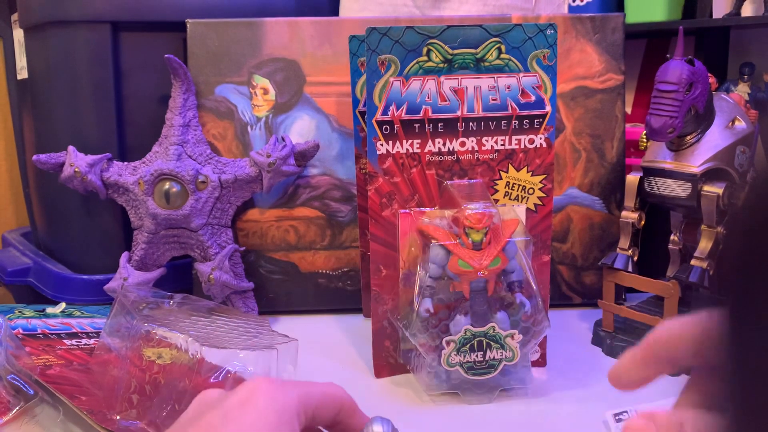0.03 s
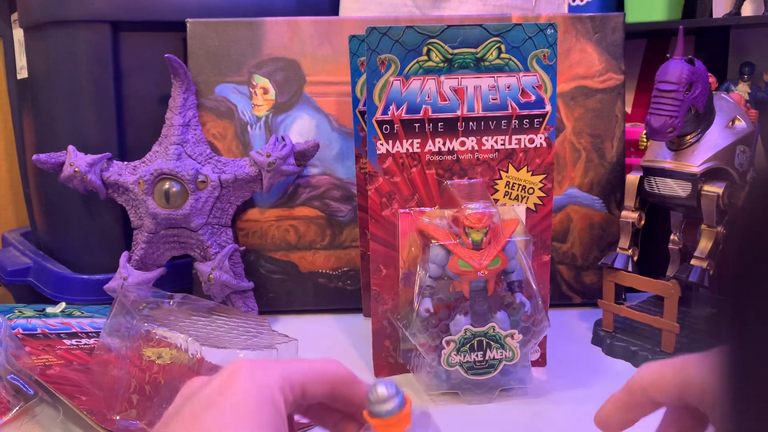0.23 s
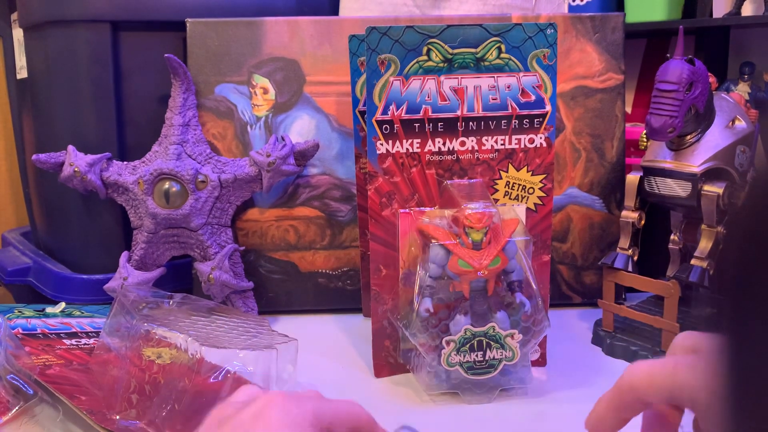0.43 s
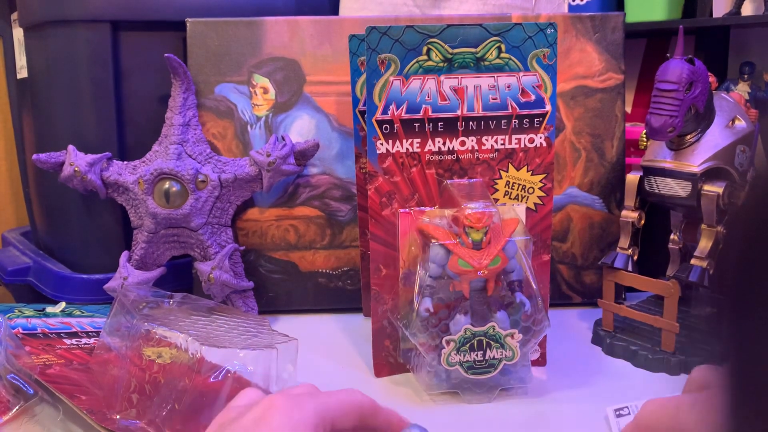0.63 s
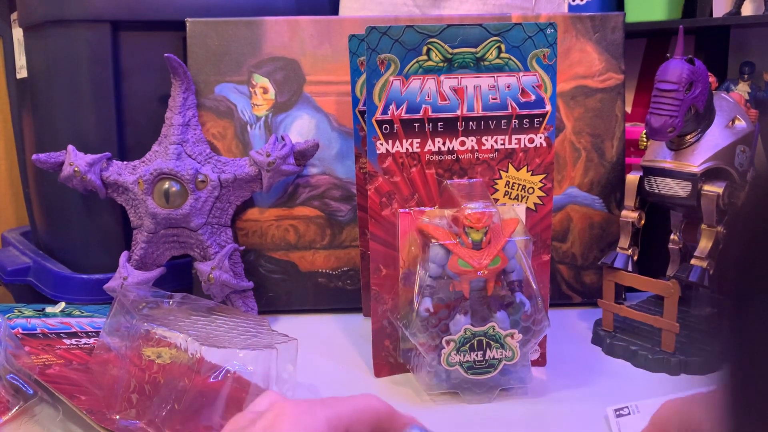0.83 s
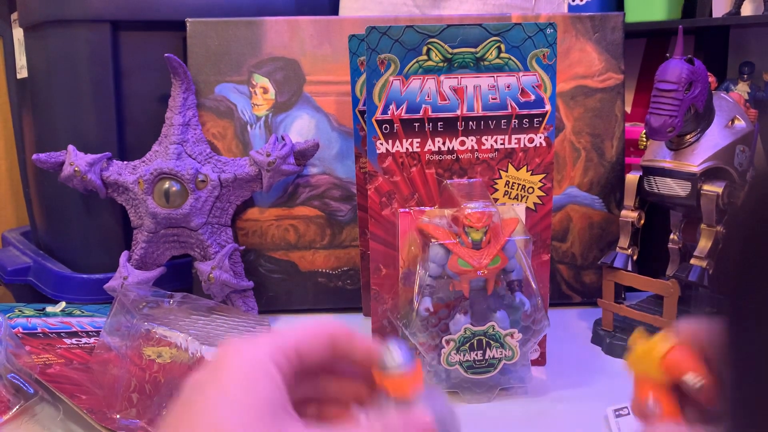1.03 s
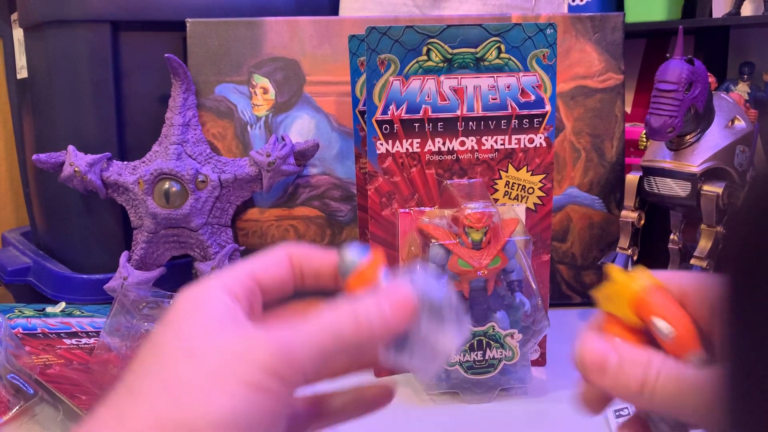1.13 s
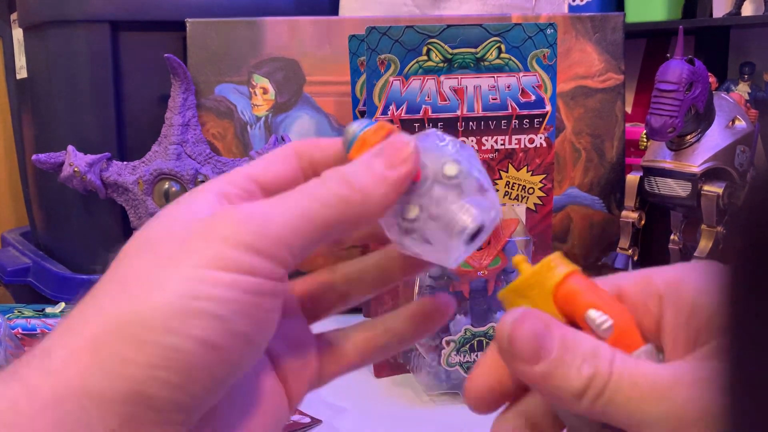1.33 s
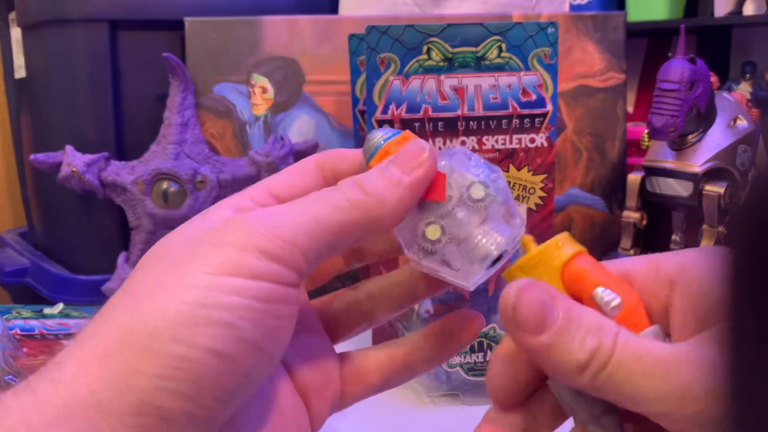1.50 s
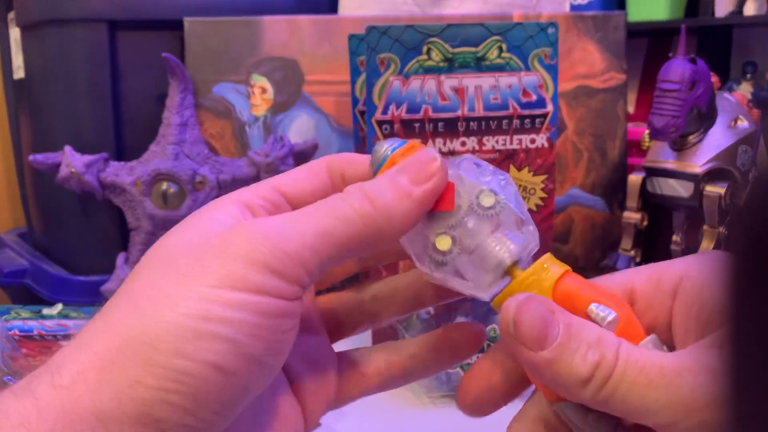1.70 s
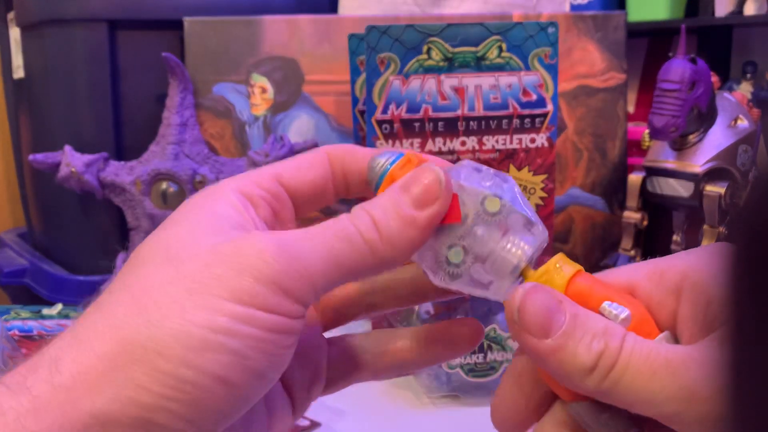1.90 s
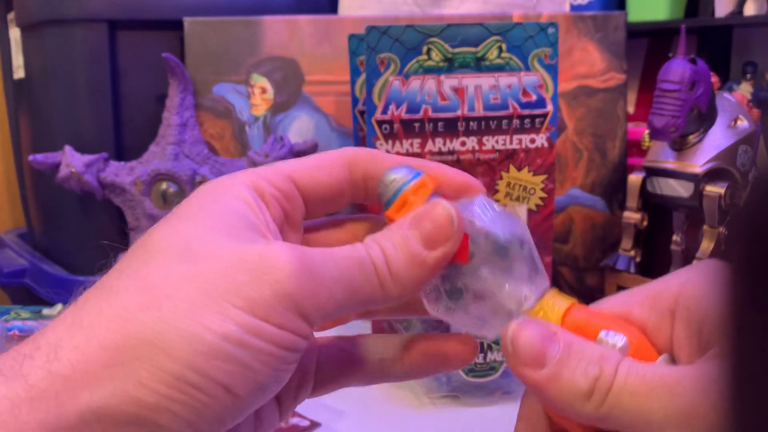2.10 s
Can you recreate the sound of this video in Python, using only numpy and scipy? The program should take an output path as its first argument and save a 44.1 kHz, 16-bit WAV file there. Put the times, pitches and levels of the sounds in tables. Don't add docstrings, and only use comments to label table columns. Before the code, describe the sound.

Hollow plastic toy part clatters on a table, then small parts click and snap in hands

```python
import sys
import numpy as np
from scipy import signal
from scipy.fft import rfft, irfft
from scipy.io import wavfile
from scipy.ndimage import uniform_filter1d

SR = 44100
rng = np.random.default_rng(int(sys.argv[2]) if len(sys.argv) > 2 else 0)


def unload_wav(signal):
    wavfile.write(
        sys.argv[1],
        SR,
        np.round(np.clip(np.atleast_2d(signal).T, -1, 1) * 32767).astype(np.int16),
    )


def ratio_of_db(decibels):
    return 10 ** (np.asarray(decibels, float) / 20)


N = 94815
T = np.arange(N) / SR
STRIKE_N = 8192
BASS_HZ = 220


def colour(x, points):
    hz, db = np.array(points).T
    f = np.arange(x.shape[-1] // 2 + 1) * SR / x.shape[-1] + 1
    gain = ratio_of_db(np.interp(np.log(f), np.log(hz), db, left=-70, right=-70))
    y = irfft(rfft(x) * gain, x.shape[-1])
    return y / np.std(y)


def curve(rows):
    s, db = np.array(rows).T
    return ratio_of_db(np.interp(T, s, db))


def walk(rate):
    k = int(SR / rate)
    steps = np.repeat(rng.standard_normal(N // k + 1), k)
    w = uniform_filter1d(steps, k)[:N]
    return w / np.std(w)


def grit(spiky_db):
    return rng.standard_normal(N) * ratio_of_db(spiky_db * walk(400.))


def band(hz, width, size=N):
    b, a = signal.iirpeak(hz, hz / width, fs=SR)
    once = signal.lfilter(b, a, rng.standard_normal(size))
    y = signal.lfilter(b, a, once)
    return y / np.std(y)


def swell(centre_s, length_s, power):
    return np.exp(-((T - centre_s) / length_s) ** power)


def decay(t60):
    return np.exp(-np.log(1000) * T[:STRIKE_N] / t60)


def ring(modes, cap_s=1.):
    hz, db, t60 = np.array(modes).T[:, :, None]
    level, detune, phase = rng.standard_normal((3, len(modes), 1))
    hz = hz * (1 + 0.008 * detune)
    tone = np.sin(2 * np.pi * hz * T[:STRIKE_N] + 2 * phase)
    y = np.sum(ratio_of_db(db + 2.2 * level) * decay(np.clip(t60, .003, cap_s)) * tone, axis=0)
    return y / np.abs(y).max()


def burst(hz, width, t60):
    return band(hz, width, size=STRIKE_N) * decay(t60)


def add(out, s, x, contact_s):
    y = x * (1 - np.exp(-(T[:len(x)] / max(contact_s, 3e-5)) ** 2))
    y = y * np.abs(x).max() / np.abs(y).max()
    i = int(s * SR)
    out[i:i + len(x)] += y[:N - i]


# time in seconds, level in dB.
RUMBLE = [(0, -71), (.18, -51), (.3, -66.5), (.44, -61), (.47, -48.5), (.55, -55), (.65, -60), (.7, -49),
          (.74, -48), (.79, -45), (.87, -46), (.92, -51), (.96, -66), (1.2, -62), (2.1, -68), (2.15, -42.5)]
# frequency in Hz, level in dB.
STAND = [(20, -34.5), (35, -8.5), (55, 2), (80, -4.5), (170, -14), (260, -22.5), (400, -38)]
# frequency in Hz, level in dB.
AIR = [(15, -31), (25, -7), (87, 5), (796, -23.5), (4370, -35.5), (7310, -60), (8360, -33), (14000, -44.5),
       (16000, -54)]


def floor():
    mid, side = colour(rng.standard_normal((2, N)), STAND) * curve(RUMBLE) * ratio_of_db(0.78 * walk(25.))
    rumble = mid + ratio_of_db(-8.5) * side * np.array([[1], [-1]])
    air = colour(rng.standard_normal((2, N)), AIR)
    low = uniform_filter1d(air, size=101, axis=1)
    air = air - low + low[0]
    fan = np.array([band(1300, 190) for _ in range(2)])
    fan = fan * ratio_of_db(-76.5 + 3.15 * walk(28.0)) * (0.62 + swell(1.1, .26, 4))
    return rumble + ratio_of_db(-63.5 + 1.8 * walk(2.0)) * air + fan


# time in seconds, level in dB.
SLIDE = [(0, -63), (.07, -76), (.14, -85), (.155, -64.5), (.2, -57), (.28, -62.5), (.32, -83.5), (.36, -53),
         (.42, -72.5), (.44, -42.5), (.5, -43.5), (.56, -57.5), (.6, -53), (.66, -51.5), (.71, -74),
         (.8, -74.5), (.83, -67), (.95, -77.5)]
# frequency in Hz, level in dB, t60 in seconds.
SHELL_MODES = [(1060.6, -0.5, 0.052), (1137, -3, 0.039), (1238, -9.5, 0.045), (1408, -11.5, 0.032),
               (1403, -15.5, .05), (1618, -0.5, 0.045), (1708, -4, .05), (2045, -13, 0.048),
               (2276, -9, 0.043), (2443, -13.5, 0.046), (2620, -12.5, .025), (2980, -8.5, 0.023)]
# frequency in Hz, level in dB, t60 in seconds.
BOARD_MODES = [(173, -3.5, 0.12), (239.4, 0.5, 0.085), (323, 1, 0.034), (392, -0.5, 0.11), (413, 1.5, 0.09),
               (529, -6, 0.073), (605.6, 0.5, 0.12), (748, -6.5, 0.059), (853, -2.5, 0.068),
               (900, -6, 0.11)]
# frequency in Hz, level in dB.
CRACK = [(1800, -30.5), (2400, -5.5), (3400, -7.5), (4600, -0.5), (5800, -10.5), (8500, -9.5), (12500, -9),
         (16000, -33.5)]
# frequency in Hz, level in dB.
SCRAPE = [(900, -17), (2300, -3), (4500, 3), (6000, -5), (9000, -16.5), (12000, -19), (16000, -36)]


def slide():
    shell = signal.fftconvolve(grit(1.9), ring(SHELL_MODES, 0.06))[:N]
    boom = signal.fftconvolve(grit(1.9), ring(BOARD_MODES, 0.033))[:N]
    rubbing = shell / np.std(shell) + ratio_of_db(5) * boom / np.std(boom)
    rubbing += ratio_of_db(-15.5) * colour(grit(0.53), CRACK)
    rubbing += ratio_of_db(-4.5 + 0.4 * walk(68.0)) * band(820, 1700)
    lifted = np.clip((1.05 - T) / 0.015, 0, 1)
    squeak = ratio_of_db(-41) * swell(.652, 0.019, 4) * band(1610.5, 59)
    scrape = ratio_of_db(-53 + 2.5 * walk(151.5)) * swell(.64, 0.014, 2) * colour(grit(1.1), SCRAPE)
    return rubbing * curve(SLIDE) * lifted + squeak + scrape


# start in seconds, shell peak in dB,
# crack in dB re shell, table boom in dB re shell, contact in milliseconds.
KNOCKS = [(0.1476, -57, -1, 2.5, 2.4), (0.185, -49, -4.5, 5.5, 0.8), (0.2113, -19.5, -11.5, -21, 2.25),
          (0.229, -35, -17, -19, 2.5), (0.2375, -37.5, -13, -6, 0.5), (0.257, -49, -7, 0.5, 2.9),
          (0.271, -45.5, -21, -4, 1.5), (.351, -32.5, -12, -9, 1.7), (0.3568, -35, -13, -7, 0.73),
          (0.37, -34.5, -21, -16.5, 2.4), (0.3887, -48.5, -15.5, -6.5, 2.1), (0.396, -47, -14, -5, 1.5),
          (0.4452, -24.5, 3.5, -8, 0.86), (0.4476, -16.5, -6.5, -4.5, 0.78), (0.4526, -16.5, -3, -9.5, 1.8),
          (0.4567, -24, -12, -4.5, 0.58), (0.4629, -25, -6.5, -6.5, 0.62), (0.4653, -19, -0.5, -6.5, 0.61),
          (.468, -19, -6, -13.5, 0.87), (0.4748, -28, -7.5, -8, 0.95), (0.479, -28.5, -4, -5, 1.8),
          (0.487, -32.5, -8, -6, 1.1), (.492, -33, -8, -2.5, 1.5), (0.5913, -44, -22, -7.5, 1.5),
          (.821, -47.5, -9, -9, 0.81)]
# frequency in Hz, level in dB, t60 in seconds.
SMALL_MODES = [(1405, -22.5, 0.035), (2870, -11.5, 0.01), (4100, -11.5, 0.0037), (4558, 3.5, 0.009),
               (5090, -12.5, 0.011), (5790, -17.5, 0.0099), (8390, -7.5, 0.012), (9200, -17, 0.013),
               (9910, -15, 0.017)]


def knocks():
    out = np.zeros(N)
    for s, db, crack_db, boom_db, contact_ms in KNOCKS:
        contact_s = contact_ms / 1000
        add(out, s, ratio_of_db(db + 2.5) * ring(SHELL_MODES, .055), contact_s)
        add(out, s, ratio_of_db(db + boom_db + 0.5) * ring(BOARD_MODES, .14), contact_s)
        crack = colour(rng.standard_normal(STRIKE_N), CRACK) * decay(.025)
        rattle = ratio_of_db(2) * ring(SMALL_MODES)
        add(out, s, ratio_of_db(db + crack_db - 3.0) * (crack + rattle), contact_s / 3)
    return out


# start in seconds, peak in dB, frequency in Hz.
THUMPS = [(0.152, -41, 193), (.447, -26.5, 151), (0.461, -32, 71.3), (0.669, -35, 70.7), (0.757, -36, 62.2),
          (0.805, -34, 77), (0.846, -35, 60.6), (0.924, -48.5, 247), (1.411, -48.5, 202),
          (1.69, -50.5, 353), (2.135, -42.5, 142)]


def thumps():
    out = np.zeros(N)
    for s, db, hz in THUMPS:
        tone = np.sin(2 * np.pi * hz * T[:STRIKE_N])
        add(out, s, ratio_of_db(db) * tone * decay(7.6 / hz), contact_s=0.0028)
    return out


# start in seconds, peak in dB, bright edge in dB re click,
# low tock in dB re click.
CLICKS = [(0.3052, -65, -13, -22), (0.751, -76, -1, -23), (0.8638, -41.5, -9.5, -30), (0.924, -56, -25, 1),
          (1.0842, -64, -7, -16.5), (1.3286, -64.5, -24, -8), (1.4128, -69, -16, 3),
          (1.4404, -38, -3.5, -6.5), (1.4447, -33, -1, -17.5), (1.4472, -34.5, -6.5, -7.5),
          (1.4481, -38.5, -5.5, -20), (1.4630, -29.5, -41, -14.5), (1.468, -42, -37, -26),
          (1.5156, -45, -31, -10), (1.5952, -34, -25, -21.5), (1.623, -60, -18.5, 2.5),
          (1.6679, -50.5, -19.5, -17), (1.679, -37, -17, -19.5), (1.8244, -54, -21, -11),
          (1.976, -68, -12, 3.5), (1.999, -72, -3, -22.5), (2.0287, -71.5, -17.5, 15), (2.048, -70, -13, 7),
          (2.076, -88, -24.5, -10), (2.1072, -73, -14, 6), (2.13, -65, -25, 13.5)]
# frequency in Hz, width in Hz.
CLATTER = [(1500, 1900), (4700, 3000), (9500, 8000)]


def clicks():
    out = np.zeros(N)
    contact_s, snap_s, snap_contact_s = 0.00037, 1.6876, .0009
    for s, db, edge_db, tock_db in CLICKS:
        for (hz, width), rel_db in zip(CLATTER, (tock_db, 0, edge_db)):
            add(out, s, ratio_of_db(db + rel_db) * burst(hz, width, 0.029), contact_s)
    add(out, 1.6871, ratio_of_db(-18.5) * burst(9300, 2700, 0.011), contact_s / 3)
    add(out, snap_s, ratio_of_db(-9.5) * ring(SMALL_MODES, .012), snap_contact_s)
    for (hz, width), rel_db in zip(CLATTER, (-16, 0, -5)):
        add(out, snap_s, ratio_of_db(-26.5 + rel_db) * burst(hz, width, 0.045), snap_contact_s)
    return out


# time in seconds, level in dB.
RUB = [(.78, -87), (.83, -66), (.88, -62), (.95, -68), (1.05, -72), (1.1, -62.5), (1.17, -68.5),
       (1.21, -75), (1.33, -73), (1.39, -80), (1.45, -55.5), (1.55, -65), (1.65, -74.5), (1.675, -56.5),
       (1.76, -72), (1.81, -72), (1.86, -61.5), (1.93, -80.5)]
# frequency in Hz, level in dB.
SKIN = [(410, -33.5), (700, -24), (1300, -9), (1600, -12.5), (4670, -4), (7200, -20.5), (8310, -14.5),
        (13900, -17.5), (16000, -26.5)]
PATCHES = [2260, 3030, 3800, 4845, 8100]


def rub():
    hiss = colour(grit(1.7), SKIN) * ratio_of_db(2.3 * walk(24.5))
    patches = sum(ratio_of_db(-13.5 + 5 * walk(30.0)) * band(hz, hz / 4) for hz in PATCHES)
    scuff = ratio_of_db(-54.5) * swell(1.421, 0.02, 2) * band(1380, 2800)
    grip = ratio_of_db(-62 + 2.4 * walk(80.)) * swell(2.14, 0.039, 2) * band(1290, 1830)
    return (hiss + patches) * curve(RUB) + scuff + grip


def ports(x, phase, pan_db):
    f = np.arange(N // 2 + 1) * SR / N
    turn = np.exp(.5j * phase * f ** 4 / (f ** 4 + BASS_HZ ** 4))
    left = irfft(rfft(x) * turn, N) * ratio_of_db(pan_db / 2)
    right = irfft(rfft(x) / turn, N) * ratio_of_db(-pan_db / 2)
    return np.array([left, right])


def room(x):
    low_t60_s, top_t60_s, gap_s = 0.1, 0.099, 0.0022
    t = T[:16384]
    noise = rng.standard_normal((2, 16384))
    low = uniform_filter1d(noise, size=9, axis=1)
    tail = low * np.exp(-np.log(1000) * t / low_t60_s)
    tail += (noise - low) * np.exp(-np.log(1000) * t / top_t60_s)
    tail *= np.clip(t / gap_s - 1, 0, 1)
    tail = tail * ratio_of_db(-9.5) / np.sqrt(np.sum(tail ** 2) / 2)
    return signal.fftconvolve(x[None], tail)[:, :N]


def scene():
    table = slide() + knocks()
    hands = clicks() + rub()
    no_bass = signal.butter(2, BASS_HZ, "high", fs=SR, output="sos")
    to_room = signal.sosfilt(no_bass, table + ratio_of_db(-6) * hands)
    direct = ports(table, 1.47, -.4) + ports(hands, 1.44, -2.8)
    return direct + room(to_room) + floor() + thumps()


def band_limit(x):
    return signal.sosfilt(signal.butter(12, 16410, fs=SR, output="sos"), x)


# frequency in Hz, level in dB.
MIC = [(25, -4.5), (60, 1.5), (6600, -.5), (7000, -10), (7500, -8), (7900, -1.5), (10600, -4), (11200, -22),
       (12200, -20.5), (12800, -4.5), (15200, -3.5), (16300, -12.5)]


def record(dry):
    hz, db = np.array(MIC).T
    f = np.arange(N // 2 + 1) * SR / N + 1
    gain = ratio_of_db(np.interp(np.log(f), np.log(hz), db, right=-60))
    mix = irfft(rfft(dry) * gain, N)
    return band_limit(mix)


dry = scene()
out = record(dry)
unload_wav(out)
```